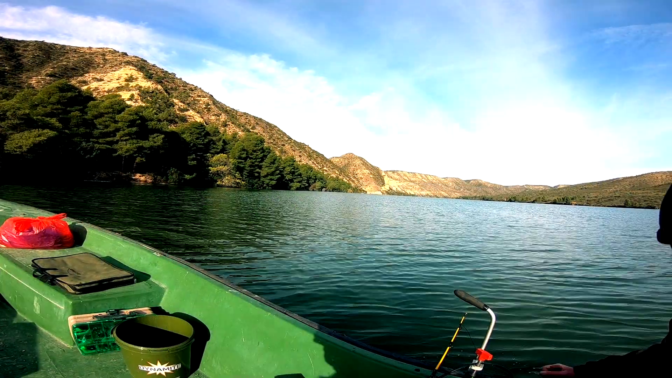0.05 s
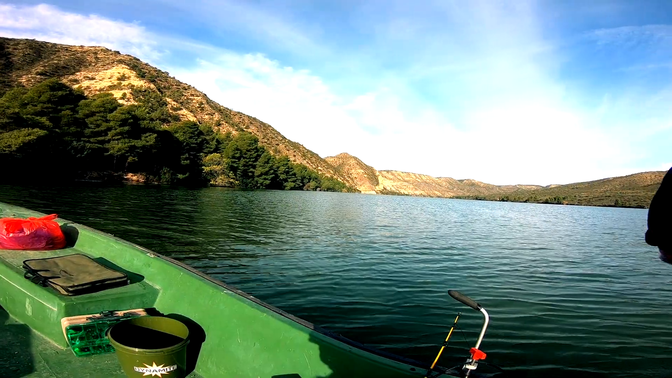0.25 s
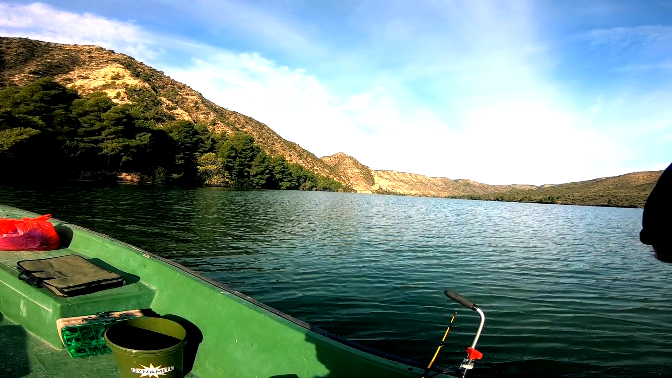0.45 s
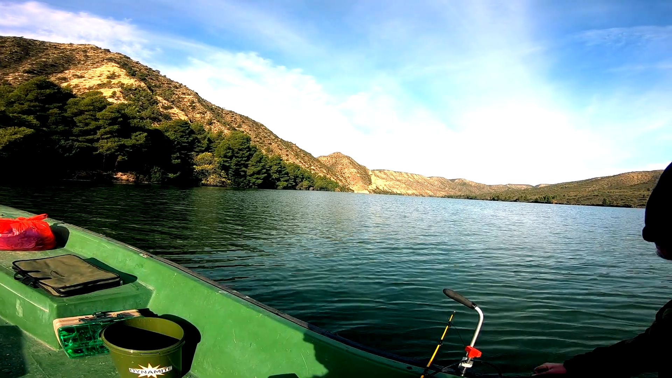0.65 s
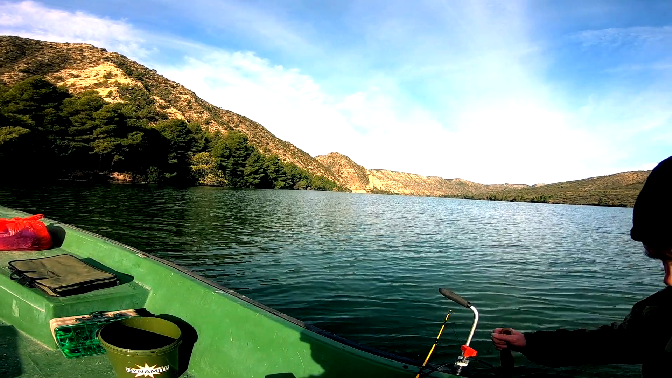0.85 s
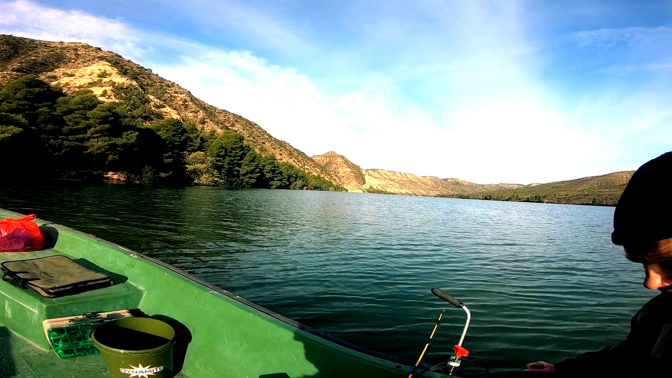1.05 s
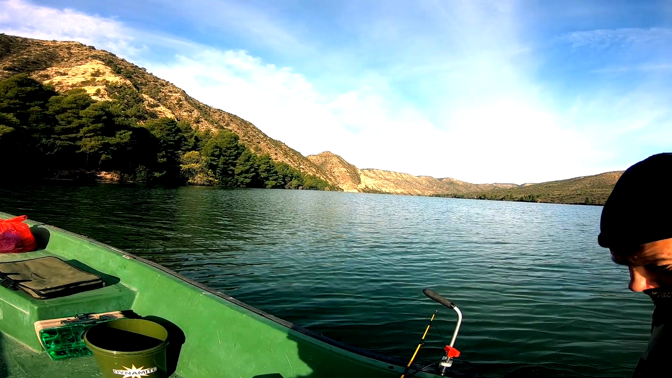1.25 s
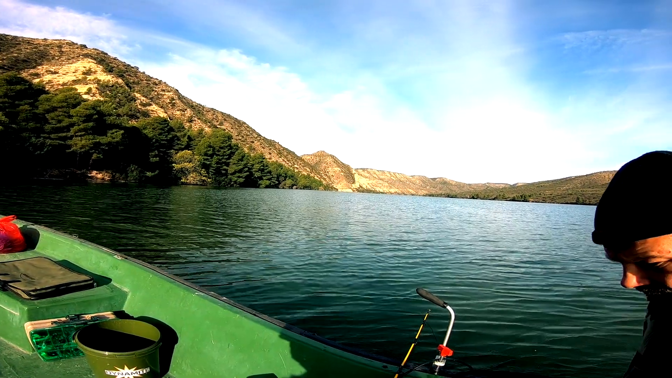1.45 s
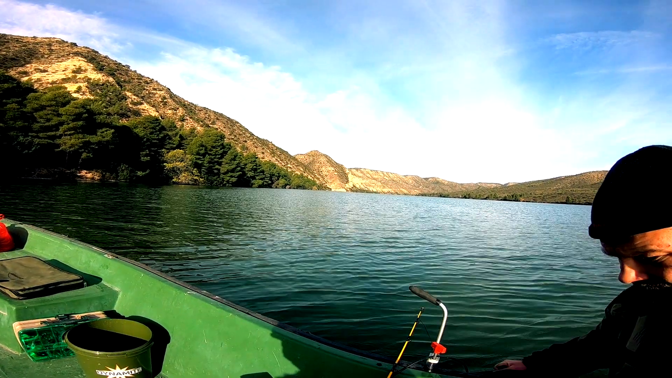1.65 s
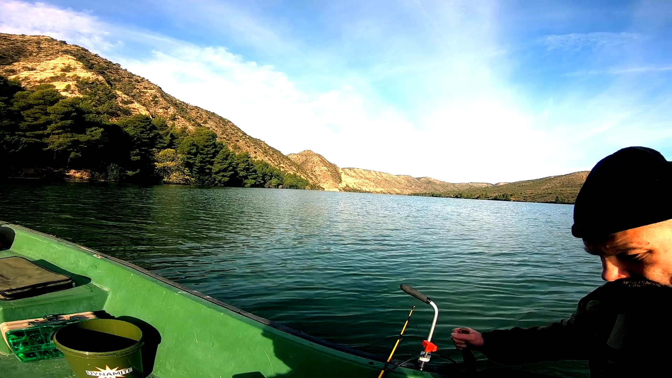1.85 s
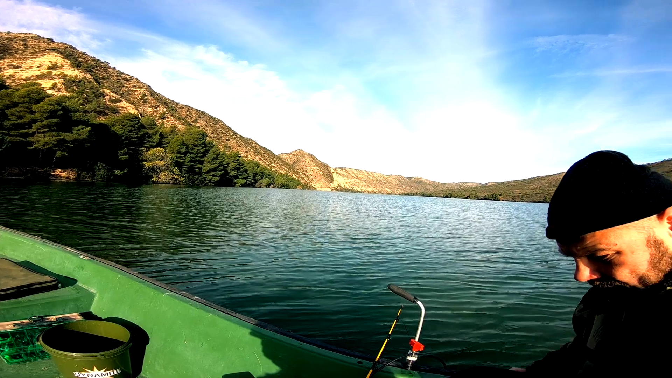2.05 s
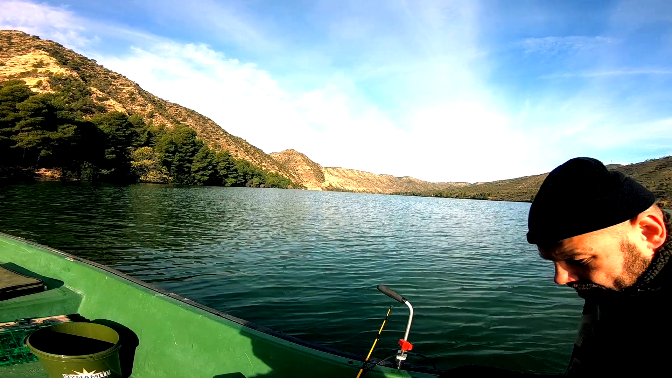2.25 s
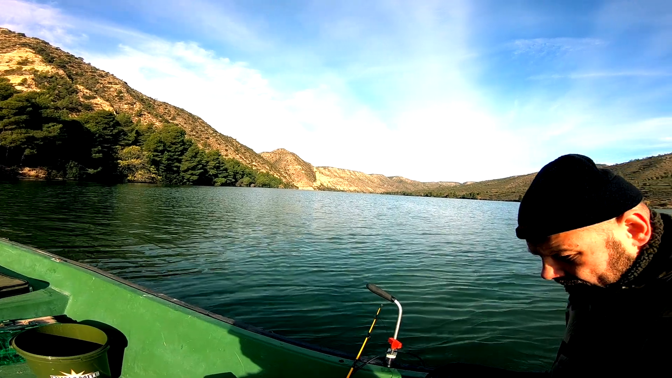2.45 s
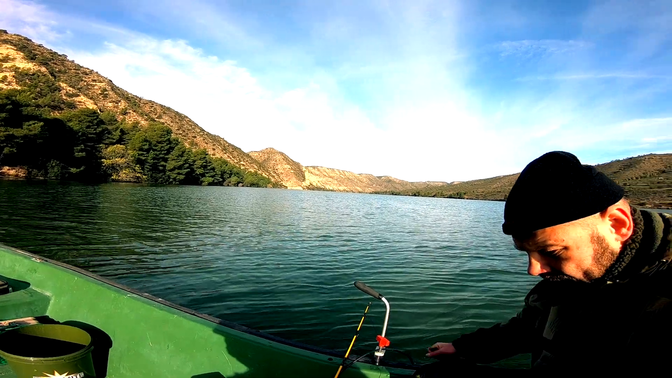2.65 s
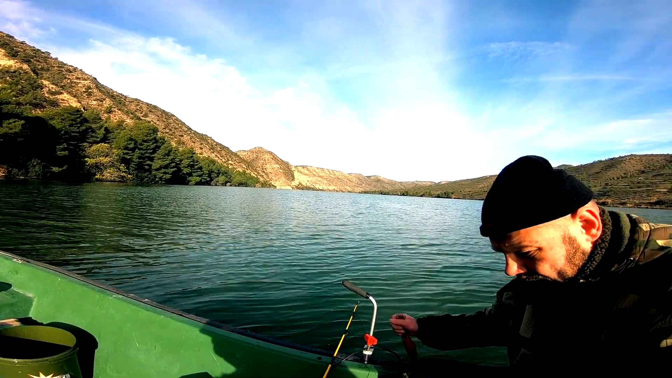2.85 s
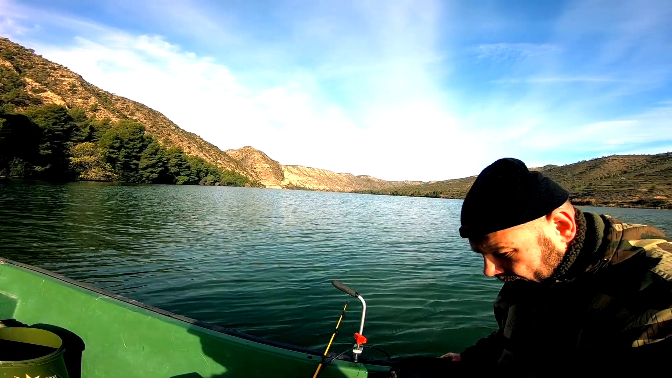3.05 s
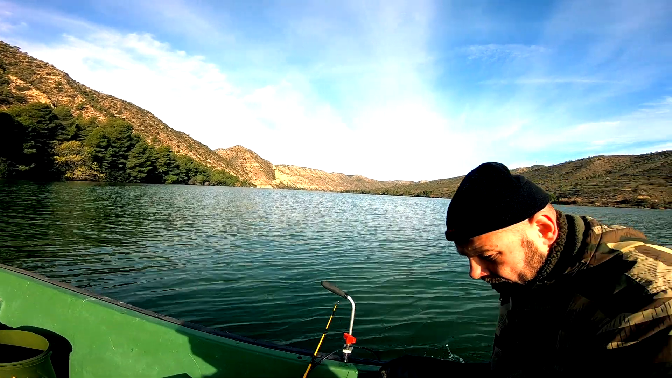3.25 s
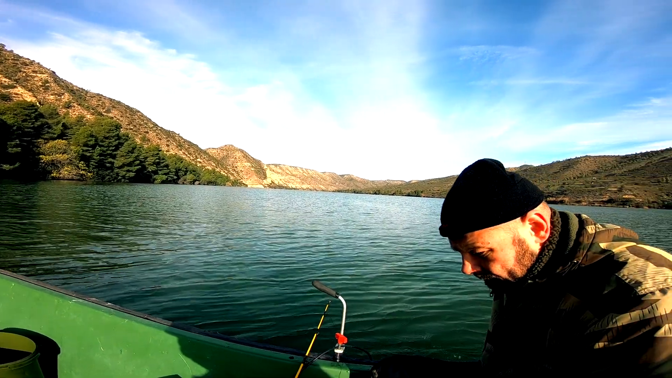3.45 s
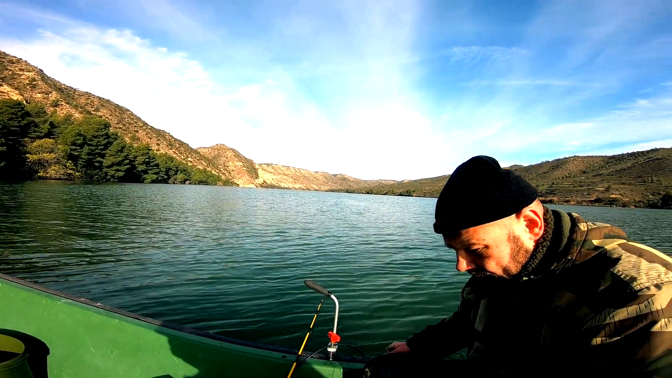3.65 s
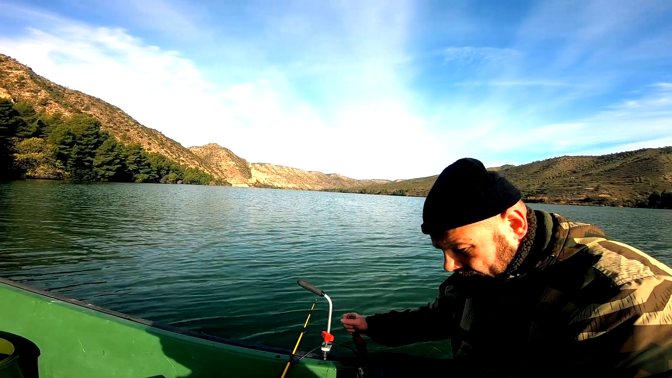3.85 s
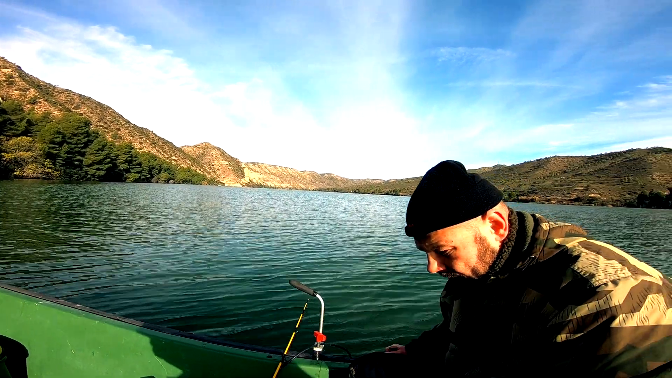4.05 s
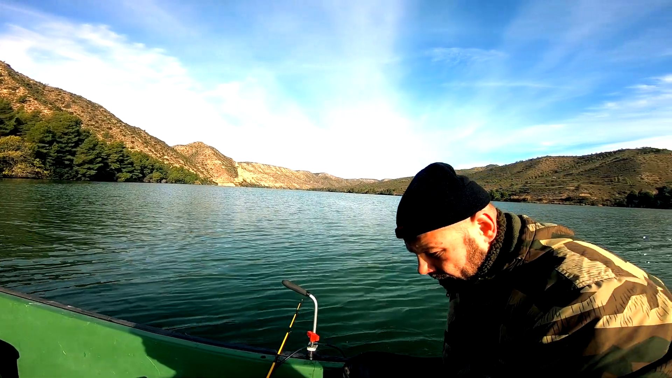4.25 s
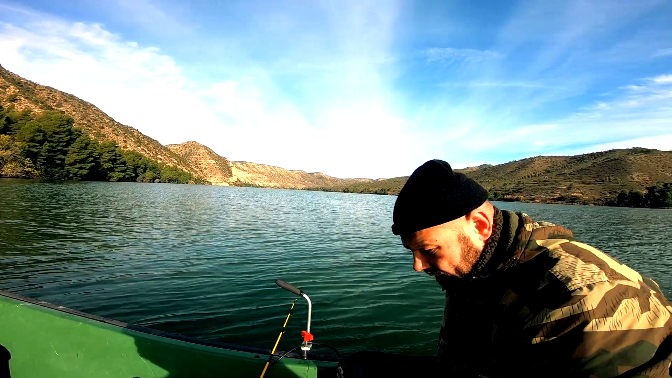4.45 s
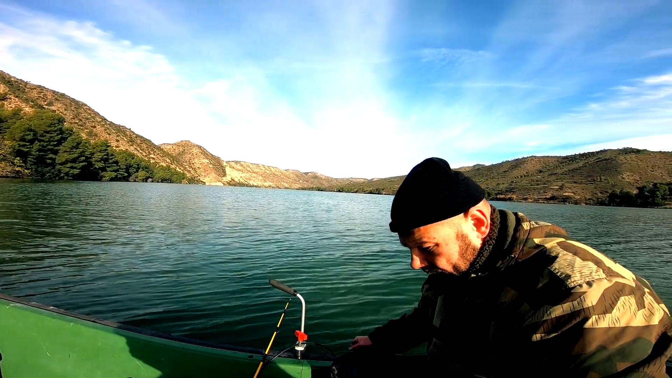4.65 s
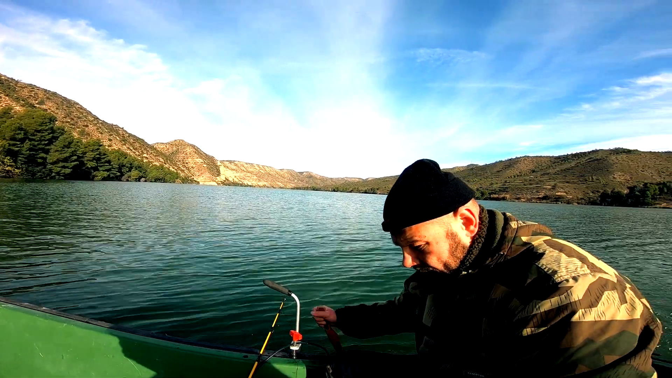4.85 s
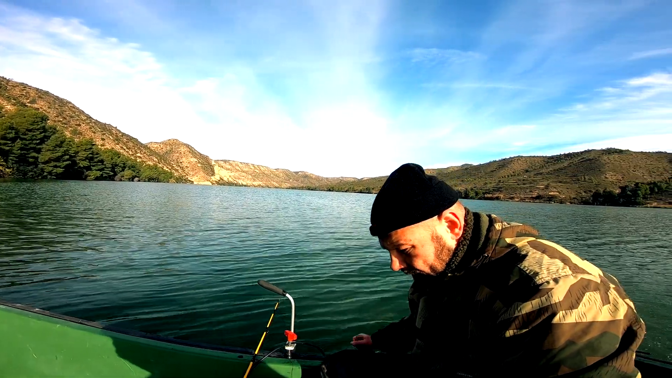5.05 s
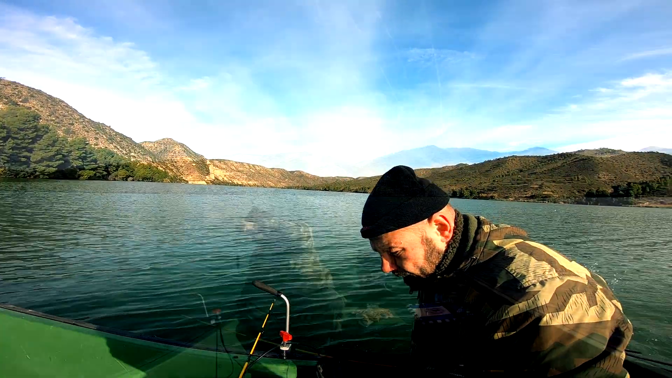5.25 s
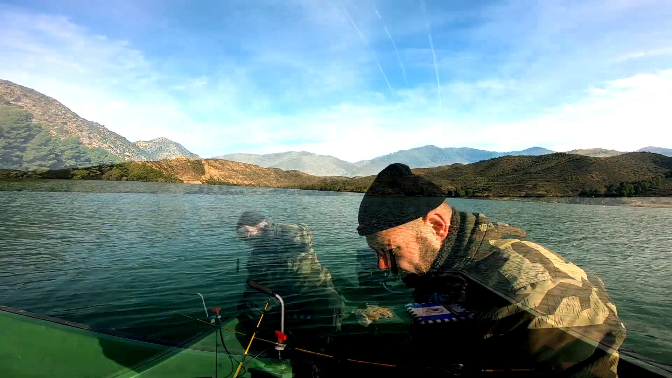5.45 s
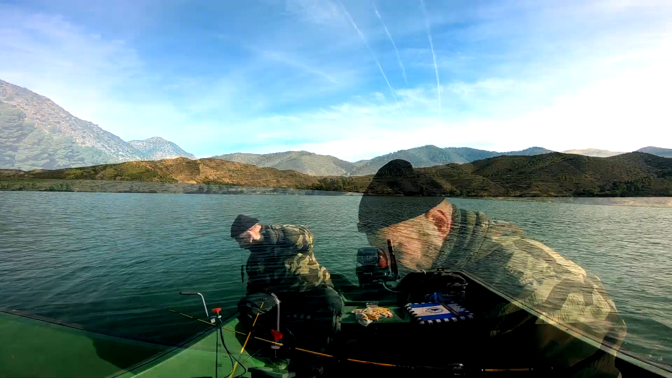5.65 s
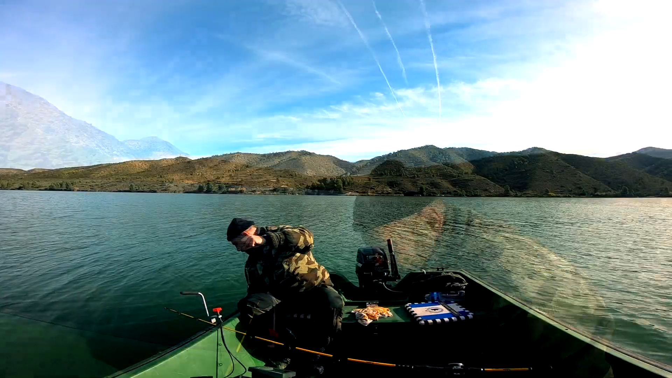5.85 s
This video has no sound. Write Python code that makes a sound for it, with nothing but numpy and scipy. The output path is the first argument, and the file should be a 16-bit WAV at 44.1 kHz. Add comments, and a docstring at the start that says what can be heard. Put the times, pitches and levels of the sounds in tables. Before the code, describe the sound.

Light wind rumbles on a microphone in a boat on a lake, and a couple of close drips fall. At about 0.2 seconds a wooden clonk plunges into the water alongside, giving a brief splash, a low throb and a deep, short bloop that rises in pitch. The stroke repeats at about 1.2, 2.1, 3.2, 4.2 and 5.2 seconds, each bloop slightly different and followed by a low slosh. These bloops are the loudest sounds. Between strokes, faint high drips, trickle and fizz run off the lifted tool, most noticeably around 2.7, 3.6 and 4.8 seconds. Wavelets knock softly and dully on the hull around 1.7 seconds, from 2.4 to 2.7, and near 5.5. The hull murmurs and a very faint hum wavers underneath. From about 5.4 seconds a gust builds, buffeting the microphone with a low rumble until the end, near 6 seconds.

```python
"""Light wind on the microphone and a few close drips, then a deep bloop and a splash about once a second.
On a lake, a small cased microphone sits in the boat while a wooden clonk is plunged in alongside. Each
stroke drags down an air cavity, which throbs low and pinches off as a large bubble whose pitch rises.
Drops run off the lifted tool. The hull murmurs and takes a few wavelets, a faint hum wavers, and a gust
builds at the end."""
import sys
import numpy as np
from scipy.fft import rfft, irfft, next_fast_len
from scipy.io import wavfile
from scipy.ndimage import map_coordinates

SR = 44100
rng = np.random.default_rng(int(sys.argv[2]) if len(sys.argv) > 2 else 0)


def bounce(signal):
    """Save signal as a 16-bit WAV file at the path given by the first command-line argument."""
    frames = np.transpose(np.atleast_2d(signal))
    limited = np.clip(frames, -1, 1)
    pcm = np.round(limited * 32767).astype(np.int16)
    wavfile.write(sys.argv[1], SR, pcm)


N = 260190
TIME = np.arange(N) / SR

# Strokes of the clonk. Cavity: entry t/s, f/Hz, level/dB. Bubble: pinch-off t/s, start f/Hz, target f/Hz,
# glide/s, level/dB, t60/s, burst t/s. Small bubble left behind: t/s, f/Hz, level/dB.
STROKES = [(0.1919, 77, -10.5, 0.2082, 105, 500, 0.0651, -4.0, 1.0, 0.2303, 0.25, 285, -34),
           (1.1765, 69, -10.6, 1.2066, 146, 331, 0.0131, 3.4, 0.078, 1.2233, 1.2203, 283, -20.3),
           (2.1379, 71, -12.3, 2.1780, 93, 272, 0.0059, 2.9, 0.058, 2.2247, 2.2046, 256, -35.6),
           (3.1816, 95, -6.9, 3.1932, 114, 474, 0.12, -2.7, 0.218, 3.2506, 3.2455, 240, -29.4),
           (4.1780, 70, -10.2, 4.2056, 101, 276, 0.0092, 1.8, 0.097, 4.235, 4.2416, 265, -33),
           (5.2018, 86, -10, 5.2151, 143, 403, 0.0458, 1.0, 0.151, 5.2479, 5.2442, 285, -27)]
FIZZ_DB = -73  # the fizz between its swells


def amp(db):
    """Gain of a level in dB."""
    return 10 ** (np.asarray(db) / 20)


def unit(x):
    """x at rms 1."""
    return x / np.sqrt(np.mean(x ** 2) + 1e-20)


def wobble(rate):
    """A smooth random curve, rate knots a second."""
    return map_coordinates(rng.standard_normal(int(N * rate / SR) + 4), [TIME * rate])


def filtered(x, response):
    """x through a filter whose gain is response(hz)."""
    size = next_fast_len(N + SR // 2)
    return irfft(rfft(x, size) * response(np.fft.rfftfreq(size, 1 / SR)), size)[..., :N]


def noise(spectrum):
    """Noise of rms 1 coloured by (f/Hz, level/dB) points on a log axis."""
    f, db = np.transpose(spectrum)
    white = rng.standard_normal(N)
    return unit(filtered(white, lambda hz: amp(np.interp(np.log(hz + 1), np.log(f + 1), db))))


def step(t, width):
    """A soft switch from 0 to 1 at t = 0."""
    return .5 + .5 * np.tanh(t / width / 2)


def dying(t, t60, attack):
    """A quick rise at t = 0, then an exponential decay."""
    age = np.maximum(t, 0)
    return amp(-60 * age / t60) * (1 - np.exp(-age / attack))


def wind():
    """Gusts buffet the microphone, the hull murmurs along, and steady air sounds the case's resonances."""
    # Wind strength at the microphone: t/s, level/dB
    gusts = [(0.0, -43.5), (0.13, -55), (0.44, -42), (0.5, -58), (1.11, -48.5), (1.32, -44.5), (1.58, -61),
             (1.7, -55), (1.87, -50.5), (2.07, -55), (2.28, -46), (2.67, -45.5), (2.92, -35), (3.0, -46),
             (3.33, -36), (3.6, -58.5), (3.9, -42), (4.0, -48.5), (4.43, -44), (4.52, -63), (4.85, -54),
             (5.13, -54.5), (5.4, -42), (5.55, -29.5), (5.75, -21), (5.9, -15.5)]
    # Spectra of the buffeting, the hull's murmur and the air in the case: f/Hz, level/dB
    buffet_spectrum = [(12, -50), (28, -9), (45, 4), (80, -1), (120, -7.5), (206, -26), (367, -37.5),
                       (500, -51), (650, -82.5), (1100, -120)]
    murmur_spectrum = [(60, -47.5), (105, -25), (145, 6.5), (185, -4.5), (220, -10), (270, -11.5),
                       (330, -20), (400, -26.5), (520, -55.5), (880, -120)]
    air_spectrum = [(210, -35), (350, -7), (400, -9), (447, 3), (500, -8), (545, -23.5), (585, -16.5),
                    (608, -1), (640, -13.5), (760, -10), (840, -8), (885, -1), (940, -10.5), (1020, -9),
                    (1090, -18.5), (1180, -5), (1420, -9.5), (1700, -6.5), (1800, -12.5), (2000, -23),
                    (2800, -60), (4800, -120)]
    gust_db = np.interp(TIME, *np.transpose(gusts))
    buffet = amp(gust_db) * unit(amp(3.3 * wobble(7.9)) * noise(buffet_spectrum))
    murmur_db = -55 + 0.97 * np.maximum(gust_db + 40, 0)  # grows with gusts above -40 dB
    murmur = amp(murmur_db) * unit(amp(3.5 * wobble(9) + 2.2 * wobble(21)) * noise(murmur_spectrum))
    air = amp(-65.5 + 1.6 * wobble(4.995)) * noise(air_spectrum)
    return buffet + murmur + air


def hum():
    """A faint low tone in the background wavers in pitch and level."""
    rms_db = -63.5 + 2.2 * wobble(3.5)
    hz = 247 + 2.224 * wobble(4.0)
    return np.sqrt(2) * amp(rms_db) * np.sin(2 * np.pi * np.cumsum(hz) / SR)


def wetness():
    """Levels of run-off and fizz in dB: water flows at each lift, swells once and drains away."""
    # The tool in the air, before the first stroke and after each:
    # run-off level/dB, stop t/s, heaviest dripping t/s, its width/s, run-off swell/dB, fizz swell/dB
    lifts = [(-72.5, 0.14, 0.03, 0.063, 1.5, 3.5), (-70.5, 0.79, 0.82, 0.069, 1.5, 2.6),
             (-70.5, 1.77, 1.83, 0.16, 0.5, 4.5), (-73, 2.79, 2.696, 0.1, 6, 5.5),
             (-70.5, 3.754, 3.56, 0.06, 10, 10), (-71, 4.75, 4.81, 0.12, 4, 6),
             (-72.5, 5.63, 5.58, 0.025, 2.5, 1.5)]
    drained_db, lift_delay_s, edge_s = -83.0, 0.097, 0.035
    run_db = np.full(N, drained_db)
    fizz_db = FIZZ_DB - 4 * step(TIME - 5.35, .09)  # sinks near the end
    starts = [-1] + [stroke[0] + lift_delay_s for stroke in STROKES]
    for start, (db, stop, heaviest, width, run_swell_db, fizz_swell_db) in zip(starts, lifts):
        flowing = step(TIME - start, edge_s) * step(stop - TIME, edge_s)
        swell = np.exp(-.5 * ((TIME - heaviest) / width) ** 2)
        run_db += (db - drained_db) * flowing + run_swell_db * swell
        fizz_db += fizz_swell_db * swell
    return run_db, fizz_db


def plinks(onset_s, db, hz, cycles, rise):
    """Tiny bubbles: sines that swell for `cycles` periods, climbing by the fraction `rise`, then die."""
    samples = np.arange(600)
    turns = hz[:, None] * samples / SR
    age = turns / cycles[:, None]
    phase = 2 * np.pi * turns * (1 + rise[:, None] * (age / 2 - 1))
    rings = amp(db)[:, None] * (age * np.exp(1 - age)) ** 2 * np.sin(phase)
    index = (onset_s * SR).astype(int)[:, None] + samples
    return np.bincount(index.ravel(), rings.ravel(), N + SR)[:N]


def drops_and_entry_ticks():
    """Single drops, plus a sharp tick each time the clonk hits the water; each throws up three droplets."""
    # Impacts on the lake, of drops and of the clonk's six entries: t/s, level/dB ahead of the port, f/Hz
    impacts = [(0.0351, -58, 6900), (0.048, -56.5, 5630), (0.192, -59, 6350), (0.401, -66, 6250),
               (0.433, -66, 6100), (0.555, -58.5, 5200), (0.5901, -64.5, 5830), (0.7073, -57, 4600),
               (0.7427, -61, 4030), (0.882, -69, 6600), (0.932, -75, 6300), (1.1752, -52, 6470),
               (1.4663, -62, 2620), (1.5976, -57, 2580), (1.7804, -62.5, 6140), (1.8238, -61, 5140),
               (1.8595, -59, 5900), (1.9101, -64.5, 6700), (1.9438, -62, 5400), (2.021, -62, 6400),
               (2.1186, -65, 6950), (2.1385, -41.5, 3430), (2.2545, -64, 3800), (2.6265, -59, 5260),
               (2.649, -57, 5000), (2.6549, -61, 3140), (2.6907, -62, 6670), (2.7162, -56.5, 2010),
               (2.7234, -63, 6600), (2.7444, -68, 2480), (2.7975, -58, 2950), (2.8004, -54, 4680),
               (2.862, -65, 5200), (2.9743, -67, 6300), (3.1485, -58, 4250), (3.1792, -55, 1960),
               (3.274, -55.5, 2160), (3.4176, -64, 2230), (3.461, -57.5, 6200), (3.491, -56.5, 2410),
               (3.5408, -62, 6360), (3.5848, -55, 2070), (3.603, -54.5, 6100), (3.629, -62, 8050),
               (3.6815, -60.5, 5200), (3.693, -63, 5070), (3.8115, -64, 6040), (4.1754, -58, 2000),
               (4.6955, -64.5, 6520), (4.731, -65, 5700), (4.7564, -48.5, 4800), (4.7852, -56, 6800),
               (4.8023, -53.5, 4750), (4.8356, -60, 6840), (4.8628, -55, 4330), (4.8765, -52, 6400),
               (4.8973, -50.5, 5900), (4.935, -63, 4340), (4.954, -64, 3980), (4.998, -71, 6300),
               (5.0833, -52, 6500), (5.2001, -52, 6400), (5.596, -67, 2250), (5.597, -61.5, 5400)]
    onset, db, hz = np.transpose(impacts)
    chance = rng.random((len(onset), 10))
    stretch = (6000 / hz) ** 0.45  # low plinks ring longer and steadier
    cycles = 4.44 * stretch * 1.1 ** (chance[:, 0] - .5)
    rise = 0.15 / stretch ** 2
    out = plinks(onset, db, hz, cycles, rise)
    out += plinks(onset, db - 3, hz, np.ones(len(onset)), rise)  # the broad tick of contact
    for late, pitch, small in chance[:, 1:].T.reshape(3, 3, -1):
        out += plinks(onset + 0.013 * late, db - 6 - 8 * small, hz * 2.2 ** (pitch - .5), cycles, rise / 2)
    return out


def trickle(run_db):
    """Thousands of faint droplets, as loud as the run-off is heavy."""
    when, rarity, pitch, ring = rng.random((4000, 4)).T
    at = when * (N - 1)
    db = run_db[at.astype(int)] - 6 - 3 * np.log(rarity + 0.012)
    return plinks(at / SR, db, 2000 * 2.9 ** pitch, cycles=2.5 + 6 * ring ** 2, rise=0.025 * ring)


def fizz_ticks(fizz_db):
    """Fine scattered ticks that stand out when the fizz swells."""
    when, faint, pitch = rng.random((220, 3)).T
    at = when * (N - 1)
    db = -70 + 1.6 * (fizz_db[at.astype(int)] - FIZZ_DB) - 2.54 * np.log(faint + 0.025)
    return plinks(at / SR, db, 3500 * 2.6 ** pitch, cycles=0.91 + 1.3 * faint, rise=0.1 * faint)


def sound_port(hz):
    """The opening in the microphone's case rings at its resonance and shuts out what lies above."""
    ratio = hz / 6600
    return 1 / (1 - ratio ** 2 + .12j * ratio) / (1 - (ratio / 2.1) ** 2 + .9j * ratio)


def runoff_and_entry_ticks():
    """Water drips, hisses and fizzes off the raised clonk, and each entry into the lake ticks sharply."""
    # Spectra of the running water and its fizz: f/Hz, level/dB
    run_spectrum = [(1200, -120), (1600, -40), (2000, 2.5), (3500, 5.5), (5500, -3.5), (7000, -12),
                    (9000, -25.5), (12000, -28), (15500, -34)]
    fizz_spectrum = [(2650, -32), (4500, -8.5), (5010, -9), (5360, -7), (6040, -4.5), (6450, -0.5),
                     (6650, -0.5), (8310, -14.5), (10800, -32), (18300, -120)]
    run_db, fizz_db = wetness()
    patter = drops_and_entry_ticks() + trickle(run_db) + fizz_ticks(fizz_db)
    hiss = amp(run_db - 5 + 1.5 * wobble(44)) * noise(run_spectrum)
    fizz = amp(fizz_db + 1.9 * wobble(60)) * noise(fizz_spectrum)
    return filtered(patter, sound_port) + hiss + fizz


def splashes():
    """Crack, slap and spray at entry, a pop and a second slap at pinch-off, then a slosh on the hull."""
    # One splash a stroke: t/s, then level/dB of entry slap, spray, pinch-off slap and pop
    entries = [(0.191, -54, -38, -50, -35), (1.175, -42, -42.5, -48, -44), (2.137, -41, -46, -44.5, -43),
               (3.178, -52, -39, -39, -49), (4.176, -48, -41.5, -44.5, -41),
               (5.198, -39.5, -43, -53, -44.5)]
    # Spectra of first contact, thrown water, the cavity's neck snapping shut and the slosh: f/Hz, level/dB
    crack_spectrum = [(3000, -63.5), (7000, -7.5), (9000, -4.5), (11000, -14), (13000, -15.5),
                      (15500, -26.5), (17000, -39)]
    spray_spectrum = [(320, -12.5), (550, -7), (828, -4.5), (960, -1.5), (1090, -14.5), (1220, -4.5),
                      (1550, -5), (1990, -3), (2820, -9.5), (4200, -7), (5710, -7.5), (6400, -3),
                      (8310, -17), (10800, -54), (18300, -120)]
    pop_spectrum = [(200, -66), (330, -5), (450, -0.5), (700, -2.5), (1000, -27), (1600, -120)]
    slosh_spectrum = [(25, -40), (50, -12), (85, 15.5), (150, -8), (260, -10.5), (330, -23.5), (500, -55),
                      (900, -120)]
    crack, slap, spray, pop, slosh = np.zeros((5, N))
    for (entry, slap_db, spray_db, pinch_db, pop_db), stroke in zip(entries, STROKES):
        since_entry, since_pinch = TIME - entry, TIME - stroke[3]
        crack += amp(spray_db - 26) * dying(since_entry + .003, t60=.21, attack=.0026)
        slap += amp(slap_db) * dying(since_entry + .0011, t60=.064, attack=.0004)
        spray += amp(spray_db) * dying(since_entry + .0076, t60=.25, attack=.0043)
        slap += amp(pinch_db) * dying(since_pinch + .011, t60=.12, attack=.0017)
        pop += amp(pop_db) * dying(since_pinch + .002, t60=.05, attack=.002)
        slosh += amp(-33.5) * dying(since_pinch - .02, t60=.46, attack=.017)  # reaches the boat later
    grain = unit(amp(3 * wobble(300)))  # spray is many small impacts
    dull_spray = filtered(noise(spray_spectrum), lambda hz: 1 / (1 + (hz / 9000) ** 6))
    spatter = crack * noise(crack_spectrum) + slap * noise(spray_spectrum) + spray * dull_spray
    return grain * spatter + pop * noise(pop_spectrum) + slosh * noise(slosh_spectrum)


def bloops():
    """The open cavity throbs, then the closed bubble rings upward as it nears the surface and bursts."""
    small_life_s = 0.04
    out = np.zeros(N)
    for stroke in STROKES:
        entry, cavity_hz, cavity_db = stroke[:3]
        pinch, start_hz, target_hz, glide, bubble_db, t60, burst = stroke[3:10]
        small_onset, small_hz, small_db = stroke[10:]
        phase = 2 * np.pi * cavity_hz * (TIME - entry)
        throb = np.sin(phase) - .12 * np.sin(2 * phase)  # a lopsided swing
        out -= amp(cavity_db) * throb * step(TIME - entry, .002) * step(pinch - TIME, .002)
        age = np.maximum(TIME - pinch, 0)
        turns = target_hz * age - (target_hz - start_hz) * glide * (1 - np.exp(-age / glide))
        bubble = np.sin(2 * np.pi * turns) * dying(age, t60, attack=.003)
        out -= amp(bubble_db) * bubble * step(burst - TIME, .004)
        progress = np.clip((TIME - small_onset) / small_life_s, 0, 1)  # the small bubble left behind
        small_turns = small_hz * small_life_s * progress * (1 + .05 * progress)
        out += amp(small_db) * np.sin(np.pi * progress) ** 2 * np.sin(2 * np.pi * small_turns)
    return out


def heard_from_boat(x):
    """The bloop reaches the microphone without sharp edges, followed by weak echoes."""
    # Echoes from the lake bed and hull: delay/s, level/dB
    echoes = [(0.044, -31), (0.058, -32.5), (0.071, -42.5), (0.103, -42.5), (0.118, -45)]

    def response(hz):
        reflected = sum(amp(db) * np.exp(-2j * np.pi * hz * delay) for delay, db in echoes)
        return (1 + reflected) / (1 + (hz / 600) ** 4)
    return filtered(x, response)


def hull_knocks():
    """Wavelets knock the hull, which answers with a short dull ring."""
    # Wavelets striking the boat: t/s, level/dB
    wavelets = [(1.638, -34.5), (1.72, -39.5), (1.8, -41), (2.376, -36), (2.397, -37.5), (2.57, -32.5),
                (2.596, -30), (2.7, -29), (5.526, -42.5), (5.577, -33.5)]
    # The hull's ring: f/Hz, level/dB
    ring_spectrum = [(80, -70), (130, 0.5), (180, 9), (300, -3.5), (450, -46), (700, -70), (1000, -120)]
    knocks = sum(amp(db) * dying(TIME - onset, t60=.078, attack=.0054) for onset, db in wavelets)
    return knocks * noise(ring_spectrum)


def scene():
    """Everything at the one microphone in the boat."""
    water = heard_from_boat(bloops()) + splashes() + runoff_and_entry_ticks()
    return (water + wind() + hull_knocks() + hum())[None]


def record(dry):
    """The camera adds its own hiss and keeps nothing above its band limit."""
    # The camera's self-noise: f/Hz, level/dB
    hiss_spectrum = [(5000, -36), (8000, -4), (10000, -6), (12000, -9.5), (14500, -27), (16000, -30.5)]
    band_limit_hz = 15700
    hiss_db = -91.5 - 3 * step(TIME - 5.3, .05)  # sinks near the end
    hiss = amp(hiss_db) * noise(hiss_spectrum)
    return filtered(dry + hiss, lambda hz: step(band_limit_hz - hz, 60))


dry = scene()
out = record(dry)
bounce(out)
```